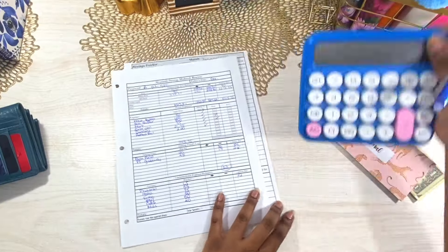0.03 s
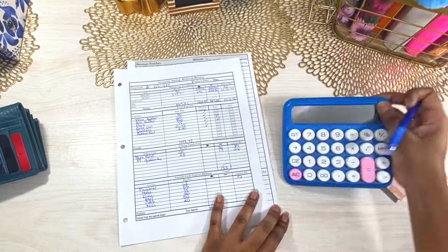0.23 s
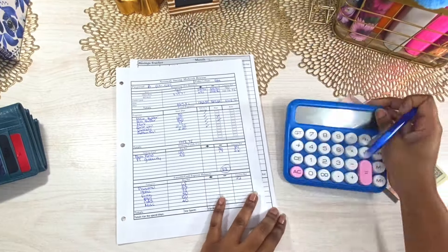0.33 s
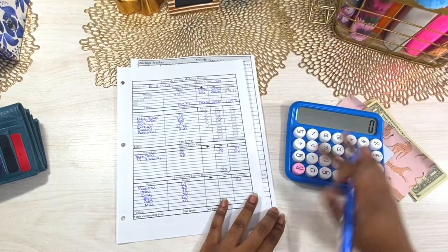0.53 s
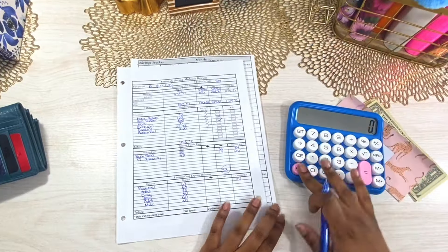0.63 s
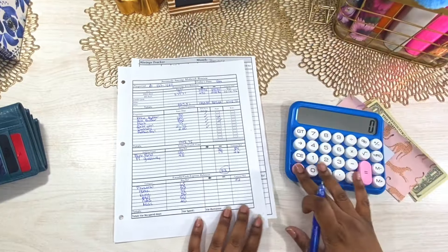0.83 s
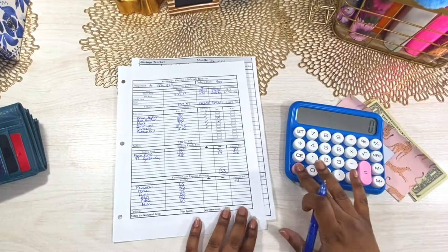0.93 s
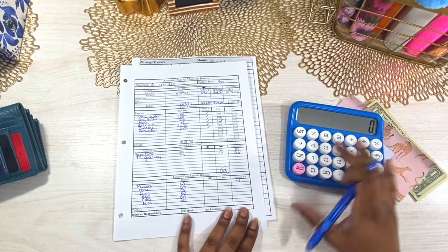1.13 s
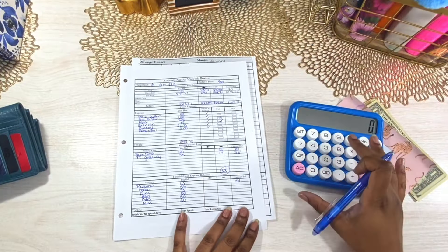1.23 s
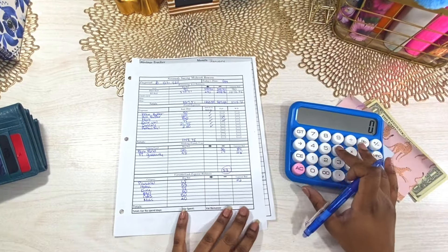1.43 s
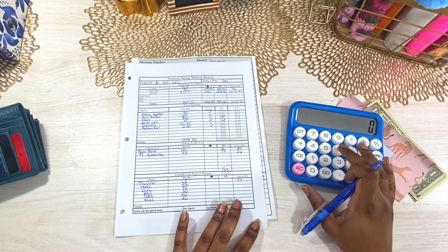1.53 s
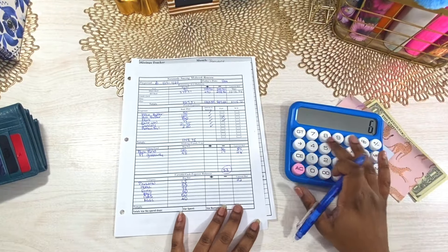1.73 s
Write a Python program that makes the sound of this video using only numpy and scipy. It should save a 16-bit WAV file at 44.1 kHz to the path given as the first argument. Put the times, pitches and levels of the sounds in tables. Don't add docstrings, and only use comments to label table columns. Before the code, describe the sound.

A plastic calculator slides in almost silently, then its edge hits a wooden desk at 0.23 seconds with a loud low thump and sharp clack. It drops flat in a rattling cluster of thuds from 0.37 to 0.5. Softer key clicks come near 0.74, 0.9 and 1.03, a faint sleeve brush on paper at 1.33, then a click with a tiny twang at 1.67 and a dull tap at 1.78. Small quiet room, close phone microphone.

```python
import sys
import numpy as np
from scipy import signal
from scipy.fft import rfft, irfft
from scipy.io import wavfile
from scipy.ndimage import uniform_filter1d

SR = 44100
rng = np.random.default_rng(int(sys.argv[2]) if len(sys.argv) > 2 else 0)


def field_ratio(decibels):
    return 10 ** (np.asarray(decibels, dtype=float) / 20)


def generate_wav(sig):
    pcm = np.round(np.clip(np.atleast_2d(sig).T, -1, 1) * 32767).astype(np.int16)
    wavfile.write(sys.argv[1], SR, pcm)


N = 79380

# pitch_hz, likeness (0 to 1)
LIKENESS = [(60, 0.82), (130, 0.54), (300, 0.21), (700, .05), (3000, 0.06), (15000, 1)]
SIDES = np.array([[.5], [-.5]])


def desk():
    # start_s, level_db, hardness_db, depth_db of the slowest modes, ring_length_factor
    thumps = [(0.2262, -12, 14, 12.5, 0.67), (0.2335, 1, -5.5, -15, 0.34), (0.249, -7, -2, 10, 0.48),
              (.15, -64.5, 23, 23, 1), (0.304, -30, 9, 21, 0.69), (0.365, -2.5, -2.5, -20, 0.69),
              (0.3796, -5, 10.5, 17, 0.42), (0.389, 0, -9, -3, 0.45), (.404, -12, 8.5, -13, 0.31),
              (0.425, -20, 16, 17, 0.64), (0.453, -8.5, -4, -10, 0.54), (0.499, -21.5, 1, 6.5, 0.66),
              (0.56, -36, -4, 16.5, 0.68), (0.62, -43, 0.5, 2, 1), (0.673, -31.5, 4, 6.5, 0.9),
              (0.741, -32.5, 11.5, -11, 0.73), (0.837, -31, 5, 5, 0.77), (0.896, -35, 5.5, 7, 0.66),
              (0.957, -31.5, 4.5, 6.5, 0.76), (1.035, -30.5, 9, 0, 0.72), (1.132, -61, -6, 2.5, 1.06),
              (1.271, -66.5, -3, 7, 1.3), (1.334, -58.5, -3, -4, 0.94), (1.494, -74, -5, 23, 1.15),
              (1.61, -39, 10.5, 2.5, 1), (1.632, -37.5, -8.5, 12, 0.53), (1.666, -41, 13.5, -15, 0.72),
              (1.775, -22.5, 2, 6, 0.29), (1.783, -32, 6, -2, 0.62)]
    # pitch_hz, level_db, t60_s, build_up_ms
    desk_modes = [(50.4, -13.5, 0.24, 16), (60.6, -8, 0.29, 27), (97, -12.5, 0.19, 36),
                  (117.7, 10, 0.12, 17.64), (172, -10, 0.13, 14), (255.5, -19, 0.11, 4.4),
                  (298.5, -6.5, 0.077, 5.5), (397, -21.5, 0.11, 6.2), (419.7, -18, 0.085, 0.56),
                  (471, -25.5, 0.09, 2.5), (570.3, -18, .11, 9.8), (140, -13.5, 0.12, 15),
                  (331.7, -12.5, 0.12, 15), (711.7, -21, 0.034, 2.4)]
    deep_hz, mid_hz, hard_hz = 80, 200, 370
    loading = .04
    damping_curve = 1.303
    t = np.arange(SR // 2) / SR
    out = np.zeros((1, N))
    for start_s, blow_db, hard_db, deep_db, ring_x in thumps:
        ring = np.zeros(len(t))
        for hz, db, t60, rise_ms in desk_modes:
            if hz > hard_hz:
                db = db + hard_db
            elif mid_hz < hz < hard_hz:
                db = db - hard_db
            if hz < deep_hz:
                db = db + deep_db
            decay_s = min(t60, 40 / hz) * ring_x
            fade = field_ratio(db - 60 * (t / decay_s) ** damping_curve)
            swell = (1 - np.exp(-1000 * t / rise_ms)) ** 2
            shift = rng.uniform(-1.4, 1)
            pitch_hz = hz * (1 + loading * shift * (hz > mid_hz))
            ring += fade * swell * np.sin(2 * np.pi * pitch_hz * t)
        add(out, start_s, field_ratio(blow_db) * ring[None])
    return out[0]


def case():
    # start_s, level_db, length_ms, brightness_db per octave, pitch_factor
    clicks = [(.016, -51, 5.3, -11, 0.75), (0.2274, -11.5, 4, -3, 0.98), (0.366, -26.5, 8.7, -13, .95),
              (0.382, -14.5, 5.3, -5, .95), (.401, -30.5, 26, -7.5, 0.88), (0.558, -51.5, 8.1, 3, 1.38),
              (0.659, -49, 5.8, -5.5, 1.21), (0.7412, -22, 3.56, -3, 1.05), (0.8955, -26, 2.8, -7.5, 0.98),
              (0.98, -52, 1.8, 9, 1.05), (1.033, -23, 3.84, -1, 1.01), (1.605, -61.5, 9.3, -1.5, 1.5),
              (1.615, -45, 5.4, -3, 1.24), (1.6663, -31.5, 3.85, 0, 0.95), (1.6738, -39, 2.5, -1, 1.8),
              (1.7708, -42.5, 2.2, -1, 1.04), (0.2334, -17, 4, -9, 1.1), (.3693, -26, 12, -4.5, 1.1),
              (0.384, -18.5, 6, -4.5, 1.3), (.39, -16.5, 6, -5.5, .9), (.3945, -24.5, 7.5, -2.5, 1.05),
              (1.776, -41, 6.8, -5, 0.94), (1.782, -38.5, 5, -10, 1.1), (.945, -61.5, 2.2, 10, 1.0),
              (1.66, -58, 7.5, -5, 1.8)]
    loose = .45
    left_lag = 2
    out, spread = np.zeros((2, N)), np.zeros((1, N))
    for start_s, click_db, ms, tilt_db, pitch in clicks:
        grain = rng.random(2000)
        ticks = rattle(ms, grain)
        ring, panel = plastic_rings(tilt_db, pitch, grain)
        blow = np.where(abs(ticks) == abs(ticks).max(), 1, loose) * ticks
        sound = signal.fftconvolve(ring, ticks[None], axes=1)
        sound = sound + signal.fftconvolve(panel, blow[None], axes=1)
        size = field_ratio(click_db) * np.sqrt(ms * SR / 1000)
        add(out, start_s, size * sound / np.sqrt(np.sum(sound ** 2) / 2))
        burst = room_burst(ticks, ms, tilt_db)
        add(spread, start_s, size * burst[None] / np.linalg.norm(burst))
    add_spring(out)
    return np.array([np.roll(out[0], left_lag), out[1]]), spread[0]


def rattle(ms, grain):
    ticks_per_ms, tick_spread_db, first_tick, sharp_ms = 4, 5, 4, 4
    samples = np.arange(len(grain))
    u = samples / SR * 1000 / ms
    hits = rng.random(len(grain)) < ticks_per_ms * 1000 / SR
    sign = np.sign(rng.random(len(grain)) - .5)
    ticks = hits * sign * field_ratio(-tick_spread_db * np.log(grain + 0.00052))
    ticks = np.where(samples == 0, first_tick, ticks)
    onset = np.minimum(1, u * 2 + (sharp_ms / ms) ** 2)
    return ticks * np.exp(-u ** 2) * onset


def plastic_rings(tilt_db, pitch, grain):
    # pitch_hz, level_db, t60_s
    case_modes = [(913, -0.5, 0.03), (1257, 1, 0.022), (1802, 8.5, 0.012), (2160, 2, 0.0076),
                  (2690, -3.5, 0.0065), (3645, 5.5, 0.012), (4340, -13.5, 0.06), (4850, 2, 0.027),
                  (5430, 7.5, 0.0047), (6660, 5, 0.0047), (7400, -6.5, 0.0057), (9060, -5, 0.036),
                  (10760, 4, 0.03), (11400, -2.5, 0.018)]
    stiff_hz, longest_ring_s = 2500, .018
    detune, phase_skew = 0.023, 0.68
    snap_db, crack_db, crack_ms = 8.5, -6, 0.3
    t = np.arange(len(grain)) / SR
    ring, panel = np.zeros((2, 2, len(t)))
    for hz, db, t60 in case_modes:
        skew = phase_skew * np.pi * rng.uniform(-1, 1) * SIDES
        decay_s = min(t60, longest_ring_s * np.sqrt(2000 / hz))
        fade = field_ratio(db + tilt_db * np.log2(hz / 2000) - 60 * t / decay_s)
        mode_hz = hz * pitch * (1 + detune * rng.uniform(-1, 1))
        part = ring if hz > stiff_hz else panel
        part += fade * np.sin(2 * np.pi * mode_hz * t + skew)
    ring[:, :2] += field_ratio(snap_db + 2 * tilt_db) * np.array([1, -1])
    crack = np.exp(-t * 1000 / crack_ms) * np.diff(grain, prepend=.5) * 4
    ring += field_ratio(crack_db + tilt_db) * (rng.random((2, 1)) * .6 + 1) * crack
    return ring, panel


def room_burst(ticks, ms, tilt_db):
    # pitch_hz, level_db
    room_colour = [(100, -25), (620, -12.5), (900, -1), (2000, 1.5), (3000, -1.5), (4500, -2),
                   (8000, -10.5), (14000, -18)]
    hz = np.fft.rfftfreq(4096, 1 / SR) + 50
    phase = np.angle(rfft(np.pad(ticks, (100, 1996))))
    colour = field_ratio(tilt_db * np.log2(hz / 2000) + read(room_colour, hz))
    burst = irfft(np.exp(1j * phase) * colour)
    return burst * np.exp(-(np.arange(4096) / (300 + 2 * ms * SR / 1000)) ** 4)


def add_spring(out):
    # level_db, pitch_hz, t60_s at first, t60_s later
    spring = (-32.5, 2331, 0.07, 0.18)
    start_s, late_db = 1.674, -5.5
    db, hz, quick_s, slow_s = spring
    t = np.arange(SR // 8) / SR
    wobble = evened(uniform_filter1d(rng.standard_normal(len(t)), 120))
    fade = field_ratio(db - 60 * t / quick_s) + field_ratio(db + late_db - 60 * t / slow_s) * wobble
    add(out, start_s, fade[None] * np.sin(2 * np.pi * hz * t) * [[1], [.7]])


def rubbing():
    # start_s, level_db
    slide = [
        (0.0, -56),
        (0.208, -56.5),
        (0.228, -42.5),
    ]
    hand = [(.44, -67), (.52, -62.5), (.65, -58.5), (.73, -59.5), (1.0, -67), (1.25, -73)]
    brush = [(1.26, -95.5), (1.29, -65.5), (1.33, -60.5), (1.36, -67), (1.385, -83), (1.44, -108),
             (1.46, -88), (1.5, -91)]
    # pitch_hz, level_db
    slide_tone = [(35, -23), (60, -8), (172, -26.5), (398, -24), (621, -21), (2250, -15.5), (3040, -26),
                  (3850, -22), (16000, -37)]
    brush_tone = [(200, -21.5), (900, -10), (1500, -3), (3000, 1), (6000, -1.5), (11500, -5.5),
                  (16000, -20)]
    # (not used, all peaks are ring_db high)
    slide_rings = [(398, 200, -1), (961, 84, -1), (1360, 100, 0), (2294, 120, 0), (4050, 180, -5),
                   (4374, 38, -7)]
    ring_db = 9.5

    def hollow(hz):
        peaks = sum(ring_db / (1 + (2 * (hz - f) / width) ** 2) for f, width, db in slide_rings)
        return read(slide_tone, hz) + peaks

    sliding = (level(slide) + level(hand)) * hiss(hollow, patchy_db=0)
    return sliding + level(brush) * hiss(lambda hz: read(brush_tone, hz), patchy_db=0)


def room(x):
    # pitch_hz, t60_s
    room_decay = [(150, 0.22), (400, 0.19), (900, 0.29), (2000, 0.3), (5000, 0.28), (12800, 0.35)]
    rise_s = 0.0007
    taps = np.zeros((2, SR // 2))
    slots = np.arange(100, SR // 2 - 20, 16)
    at = slots + rng.integers(0, 16, (2, len(slots)))
    np.put_along_axis(taps, at, rng.choice([-1., 1.], at.shape), 1)
    hz, t, z = signal.stft(taps, SR, nperseg=256)
    z = shared_bass(z[0], z[1], hz)
    tail = signal.istft(z * field_ratio(-60 * t / read(room_decay, hz)[:, None]), SR, nperseg=256)[1]
    tail = tail * (1 - np.exp(-np.arange(tail.shape[1]) / SR / rise_s))
    return signal.fftconvolve(x[None], tail / np.linalg.norm(tail[0]), axes=1)[:, :N]


def air():
    # pitch_hz, level_db
    air_tone = [(30, -7.5), (58, -3), (120, -9.5), (250, -18), (500, -24.5), (1000, -20.5), (3000, -32),
                (16000, -39.5)]
    # start_s, level_db
    drone_level = [(1.34, -105), (1.375, -78), (1.415, -83.5), (1.45, -80), (1.475, -94), (1.5, -86),
                   (1.53, -105)]
    air_db, drone_hz, glide_hz_per_s = -70, 965, 200
    t = np.arange(N) / SR - drone_level[0][0]
    waver = 1 + .008 * evened(uniform_filter1d(rng.standard_normal(N), 1500))
    pitch_hz = (drone_hz + glide_hz_per_s * t) * waver
    drone = np.sqrt(2) * np.sin(2 * np.pi * np.cumsum(pitch_hz) / SR)
    tone = field_ratio(air_db) * hiss(lambda hz: read(air_tone, hz), patchy_db=3)
    return tone + level(drone_level) * drone


def gap_near_top(x):
    notch_hz, width_hz, notch_db = 13400, 900, -30.5
    hz = np.fft.rfftfreq(N, 1 / SR)
    return irfft(rfft(x) * field_ratio(notch_db * np.exp(-((hz - notch_hz) / width_hz) ** 4)), N)


def hiss(colour_db, patchy_db):
    frames, hz = N // 128 + 5, np.fft.rfftfreq(512, 1 / SR)
    a, b, c, d, patches = rng.standard_normal((frames, 257, 5)).T
    patches = evened(uniform_filter1d(uniform_filter1d(patches, 6, 0), 12, 1))
    z = shared_bass(a + 1j * b, c + 1j * d, hz)
    z = z * field_ratio(colour_db(hz)[:, None] + patchy_db * patches)
    return evened(signal.istft(z, nperseg=512, noverlap=384)[1][:, :N])


def shared_bass(left, other, hz):
    same = np.clip(read(LIKENESS, hz), -1, 1)[:, None]
    return np.array([left, same * left + np.sqrt(1 - same ** 2) * other])


def level(curve):
    s, db = np.transpose(curve)
    return field_ratio(np.interp(np.arange(N) / SR, s, db, left=-140, right=-140))


def read(points, hz):
    f, value = np.transpose(points)
    return np.interp(np.log(hz + 1), np.log(f + 1), value)


def evened(x):
    return x / np.sqrt(np.mean(x ** 2) + 1e-20)


def add(mix, s, sound):
    part = mix[:, round(s * SR):][:, :sound.shape[1]]
    part += sound[:, :part.shape[1]]


def high(x, hz):
    return signal.sosfilt(signal.butter(4, hz, "high", fs=SR, output="sos"), x)


def scene():
    case_low_hz, airborne_hz = 760, 213
    room_db, modes_room_db, desk_room_db = -6.5, -19, 1
    desk_pan_db, case_pan_db = -2.5, 0.6
    plastic, spread = case()
    plastic = high(plastic, case_low_hz)
    wood = desk()
    to_room = field_ratio(room_db) * spread + field_ratio(modes_room_db) * plastic[1]
    to_room = to_room + field_ratio(desk_room_db) * high(wood, airborne_hz)
    close = wood * field_ratio(desk_pan_db * SIDES) + plastic * field_ratio(case_pan_db * SIDES)
    return close + gap_near_top(room(to_room) + rubbing() + air())


def band_limit(x):
    return signal.sosfilt(signal.butter(12, 17010, fs=SR, output="sos"), x)


def record(dry):
    ceiling, low_hz, edge_hz = 1.5, 40, 16000
    soft = ceiling * np.tanh(dry / ceiling)
    hz = np.fft.rfftfreq(N, 1 / SR)
    band = 1 / np.sqrt(1 + (hz / edge_hz) ** 160) / (1 + (low_hz / (hz + 1)) ** 6)
    return band_limit(irfft(rfft(soft) * band, N))


dry = scene()
out = record(dry)
generate_wav(out)
```